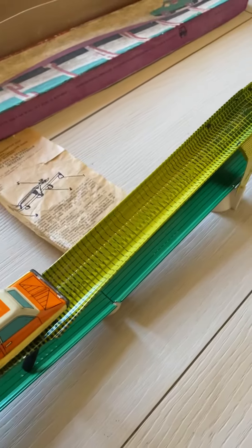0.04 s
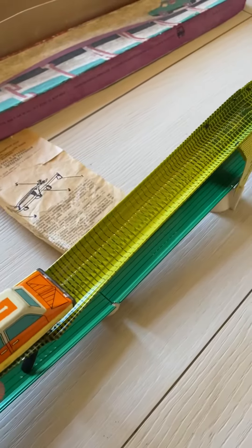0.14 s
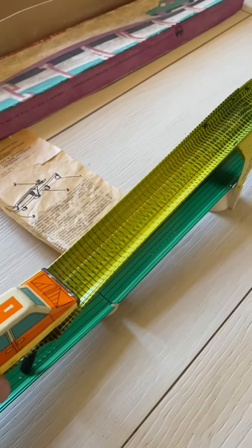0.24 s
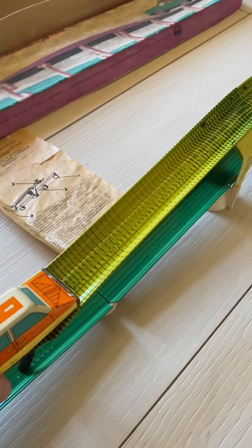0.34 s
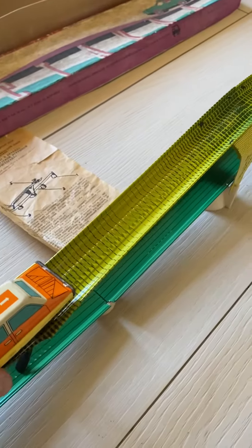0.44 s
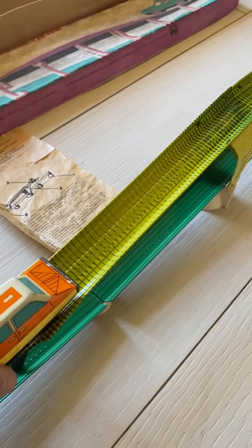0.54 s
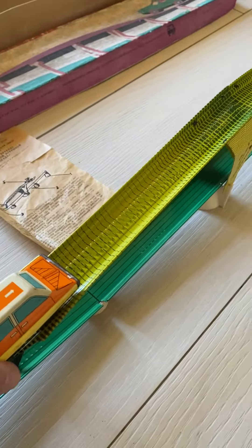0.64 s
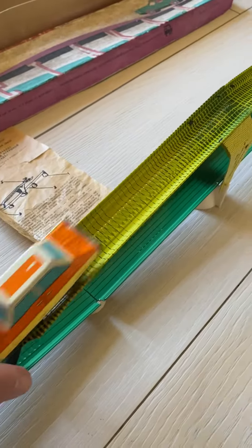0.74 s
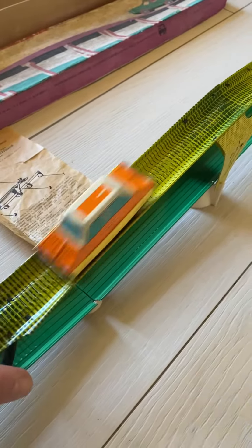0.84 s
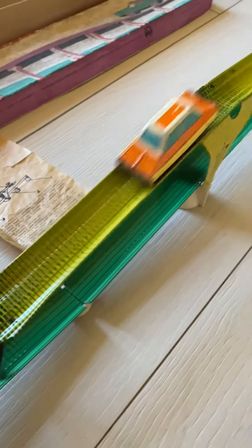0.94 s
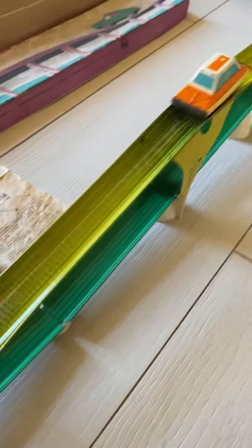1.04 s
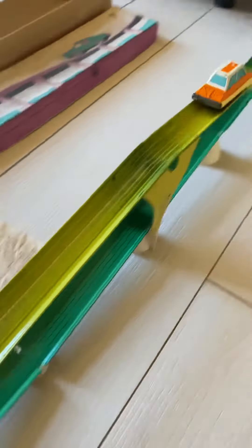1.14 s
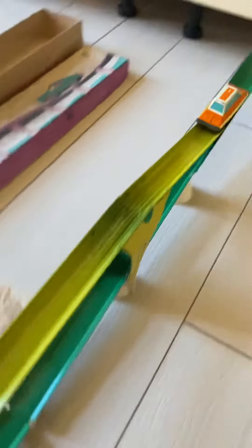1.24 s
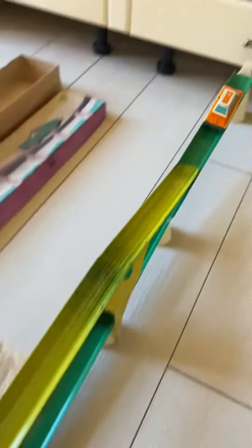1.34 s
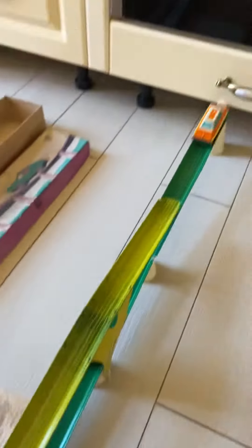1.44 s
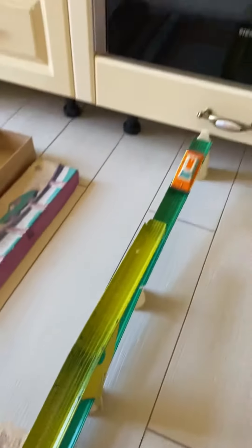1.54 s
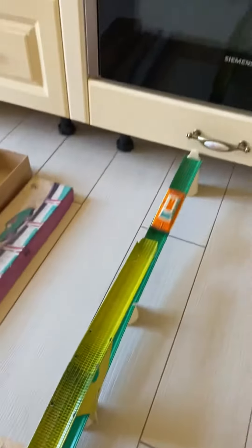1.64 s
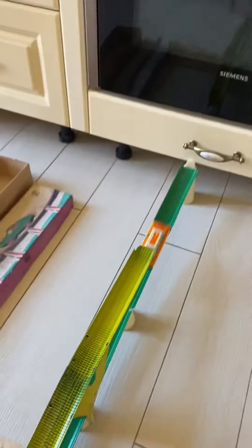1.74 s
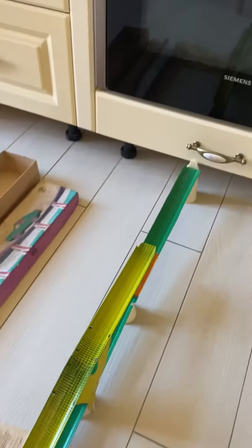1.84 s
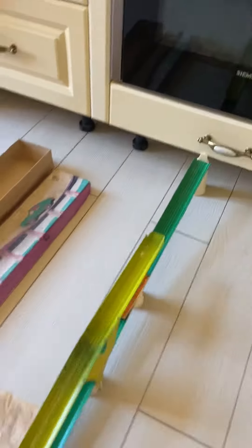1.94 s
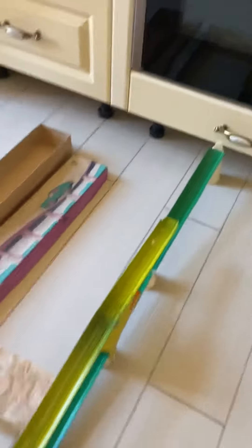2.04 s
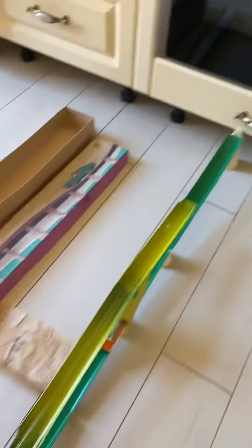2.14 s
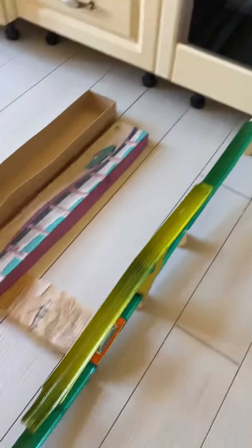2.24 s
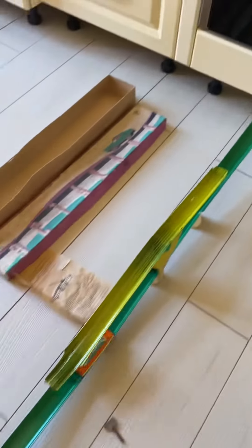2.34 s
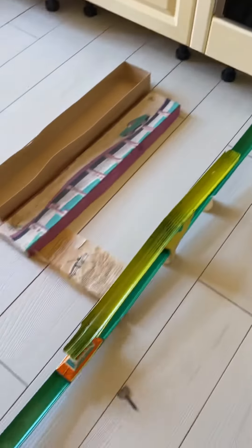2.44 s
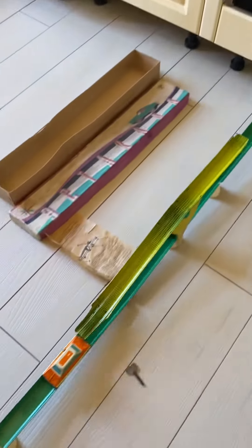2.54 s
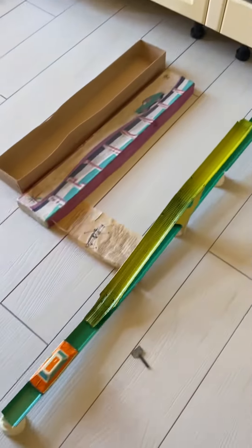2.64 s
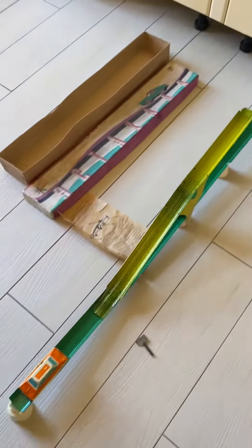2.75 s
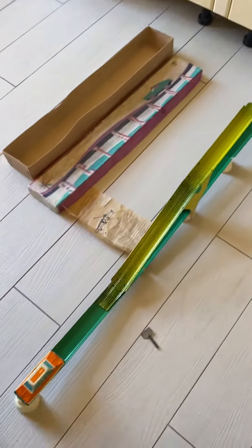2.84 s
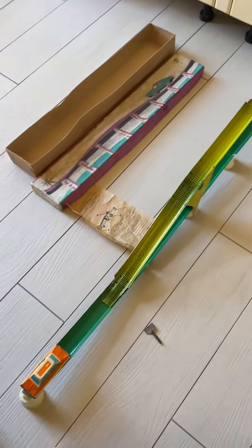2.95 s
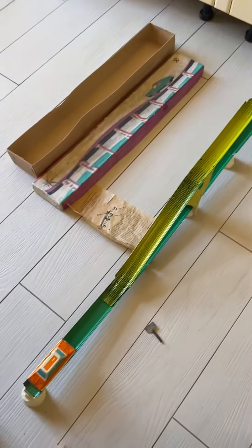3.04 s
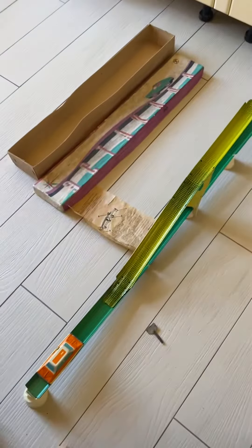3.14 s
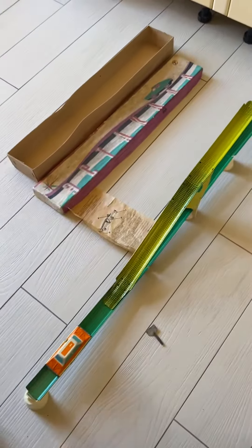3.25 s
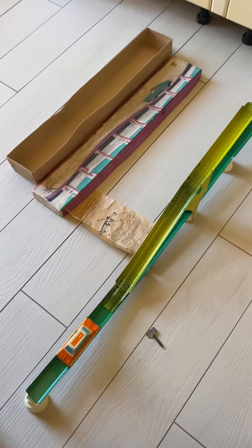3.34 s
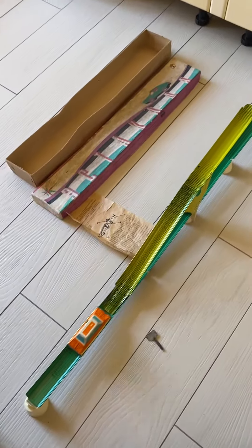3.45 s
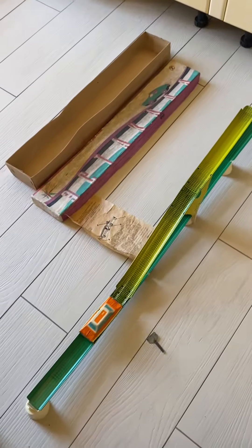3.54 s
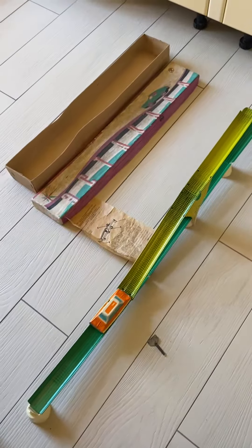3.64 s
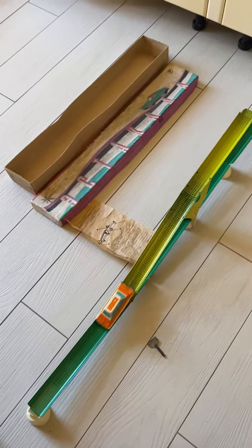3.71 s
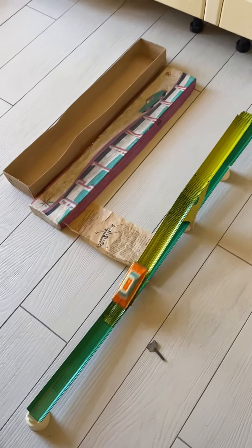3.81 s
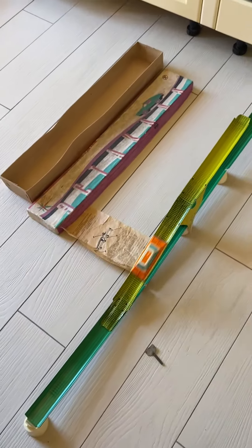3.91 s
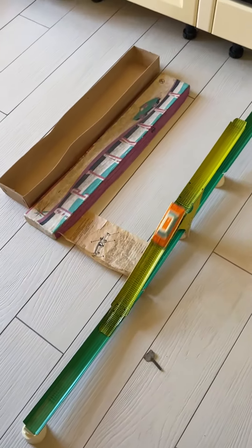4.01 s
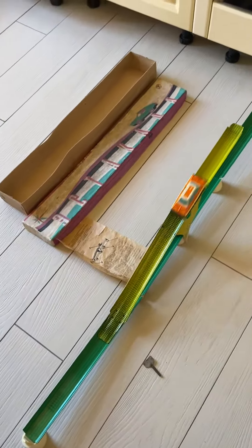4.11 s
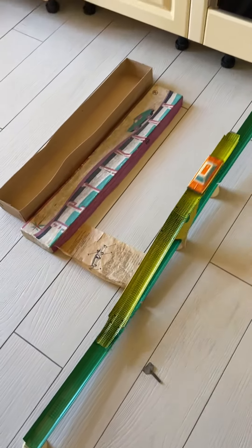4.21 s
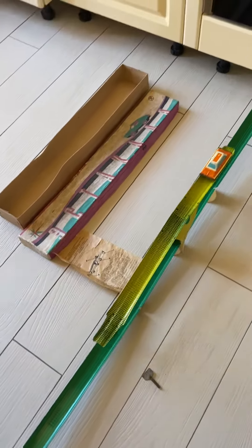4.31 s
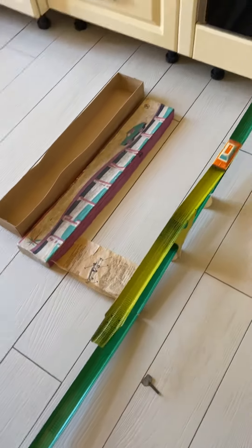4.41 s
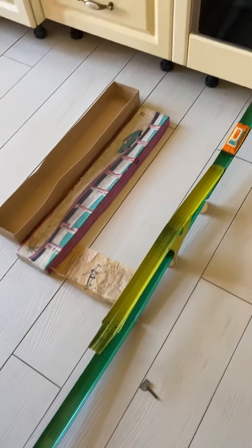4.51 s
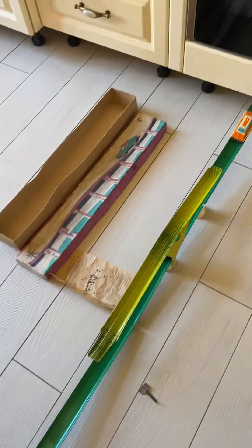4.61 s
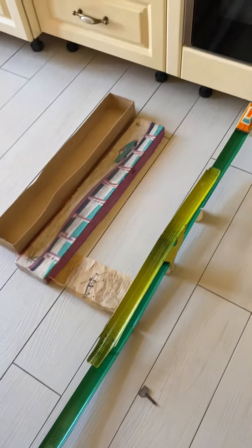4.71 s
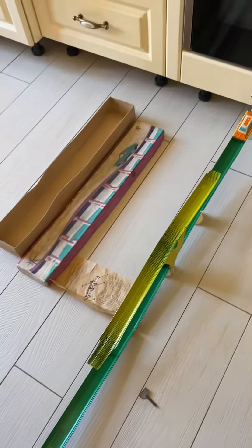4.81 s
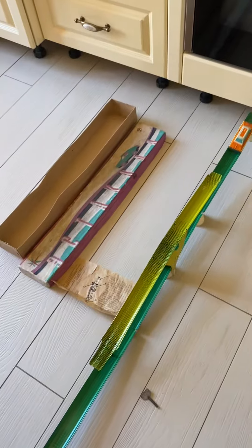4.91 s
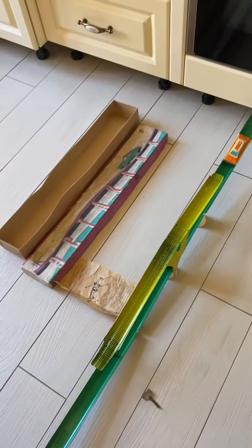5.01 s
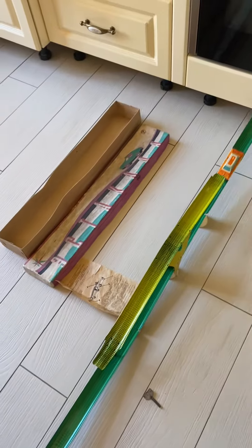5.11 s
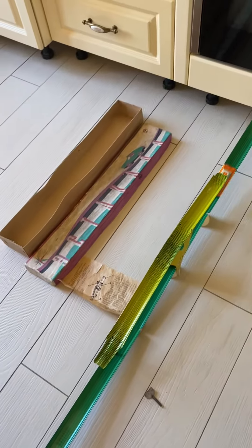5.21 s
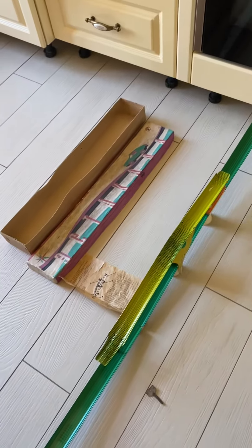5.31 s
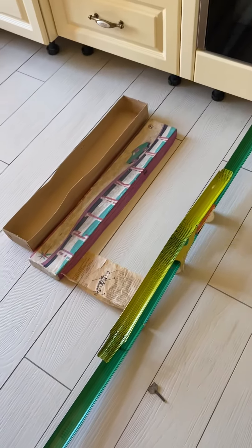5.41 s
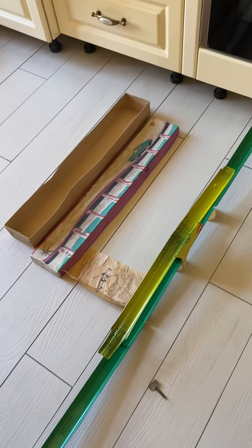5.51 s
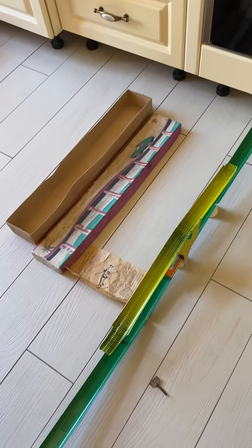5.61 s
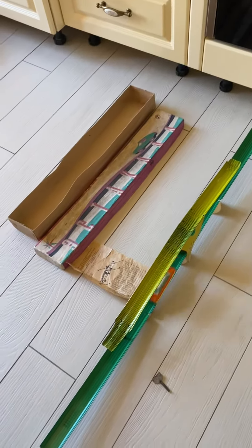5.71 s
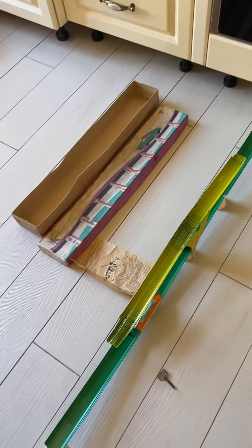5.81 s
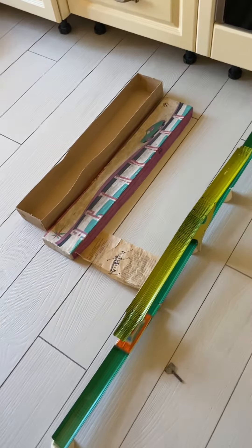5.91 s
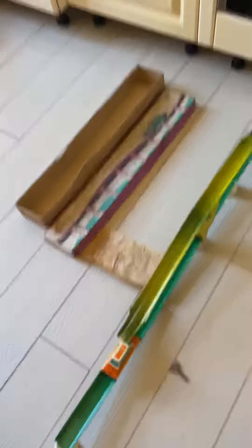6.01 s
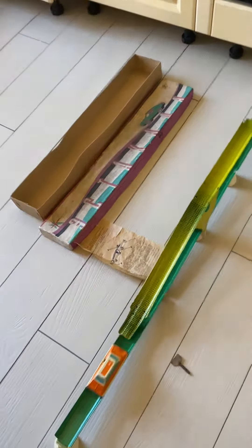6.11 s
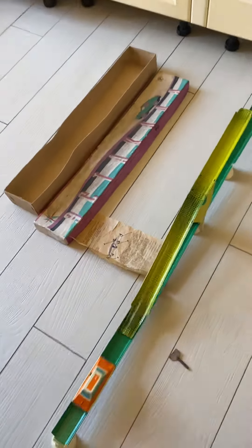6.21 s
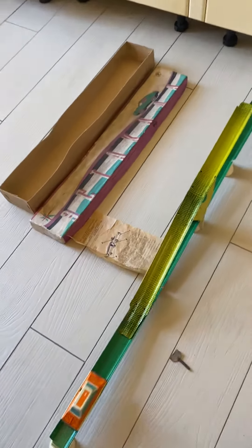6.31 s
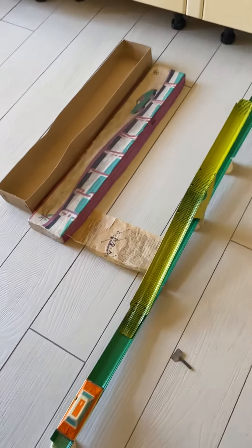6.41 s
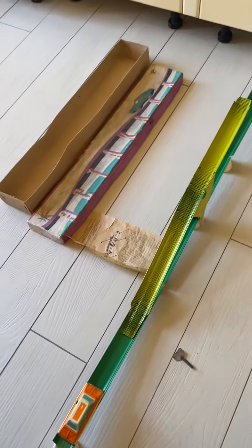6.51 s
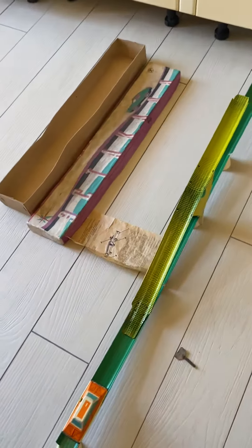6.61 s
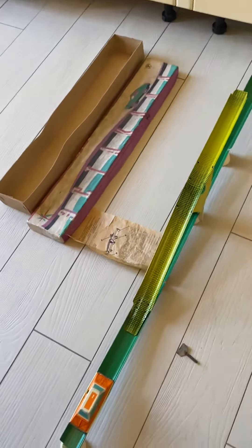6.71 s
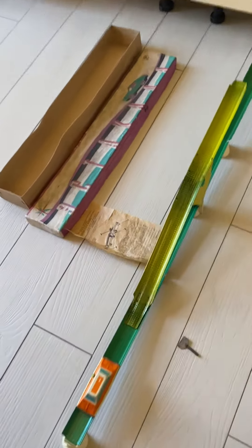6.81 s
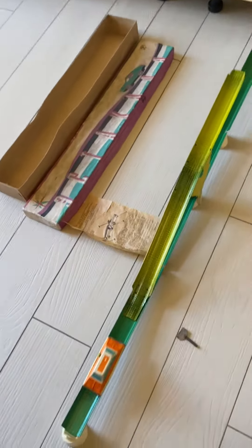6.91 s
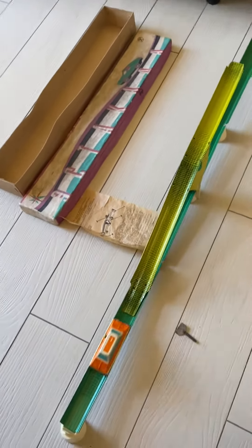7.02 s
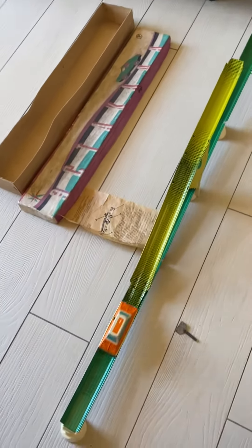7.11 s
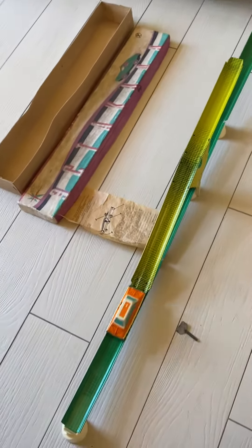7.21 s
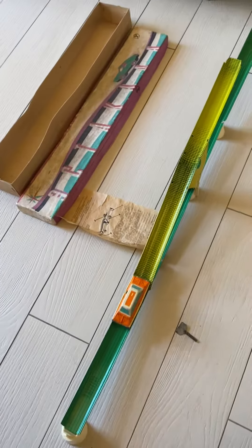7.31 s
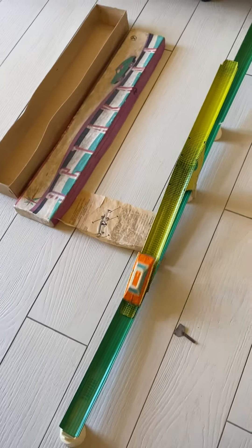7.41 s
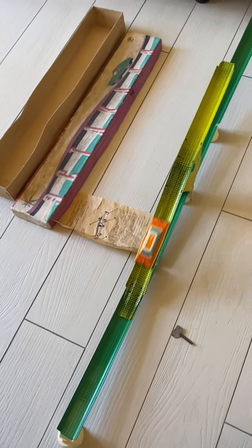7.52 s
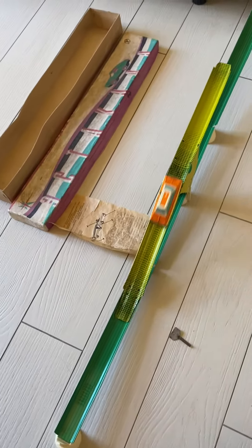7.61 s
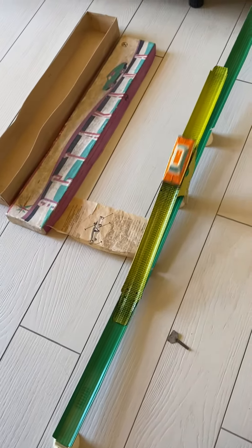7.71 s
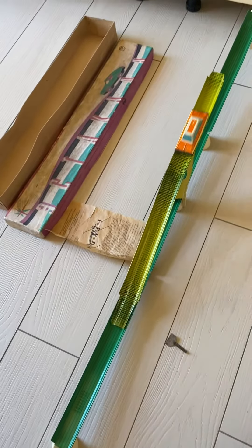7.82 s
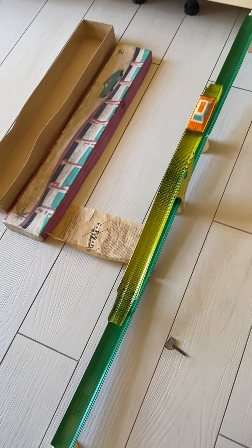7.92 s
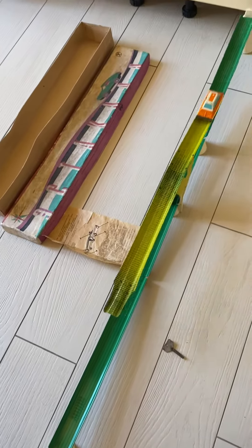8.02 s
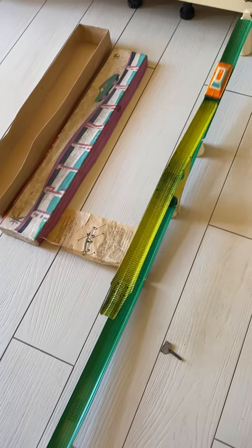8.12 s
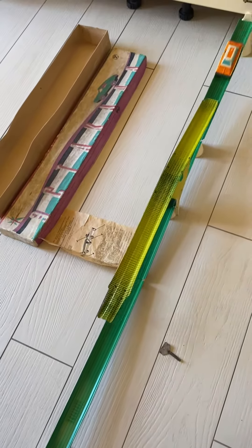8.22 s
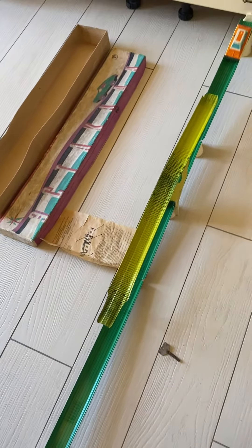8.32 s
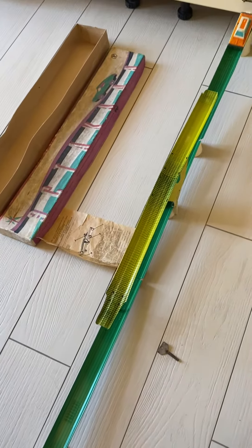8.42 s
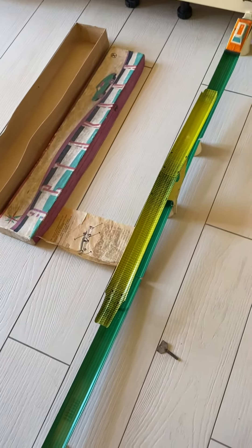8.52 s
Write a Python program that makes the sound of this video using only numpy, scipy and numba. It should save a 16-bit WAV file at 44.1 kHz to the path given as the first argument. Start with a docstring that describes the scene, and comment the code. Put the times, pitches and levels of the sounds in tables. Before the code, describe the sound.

In a quiet kitchen, a low hum wavers and a hand shifts a clockwork tin car with a few small clicks. The car sets off, rasping up a ribbed metal ramp, then clanks down and bumps a hollow end stop. Its wheels and gears chatter along the track, clanking over joints. The climb and bump happen three times in all, heard close by in stereo with a short room tail.

```python
"""A low hum wavers in a quiet kitchen; a hand shifts a tin clockwork car, which sets off on a tin track.
Three times its cog rasps up a ribbed ramp, each rib shaking the two ringing leaves.
Between climbs its wheels and gears chatter, it clanks over joints and thuds into the hollow end stop.
Hard floor and cupboards add a short tail."""
import sys
import numpy as np
from scipy import signal
from scipy.fft import rfft, irfft, next_fast_len
from scipy.io import wavfile
from scipy.ndimage import uniform_filter1d
from numba import njit

SR = 44100
rng = np.random.default_rng(int(sys.argv[2]) if len(sys.argv) > 2 else 0)


def store_pcm(level_fs):
    """Save levels as 16-bit WAV."""
    pcm = np.round(np.clip(level_fs, -1, 1) * 32767).astype(np.int16)
    wavfile.write(sys.argv[1], SR, np.atleast_2d(pcm).T)


N = 377055
T = np.arange(N) / SR

# hum and rumble envelope: time_s, level_db
HUM_LEVELS = [(0.0, -34.5), (0.09, -52), (0.14, -43), (0.76, -45.5), (0.83, -62), (1.07, -63), (1.19, -52),
              (1.4, -72), (1.59, -58), (1.71, -93), (1.9, -64), (2.07, -88.5), (4.5, -63.5), (4.55, -75),
              (6.45, -59.5), (6.69, -65.5), (7.98, -60), (8.1, -63.5), (8.45, -58), (8.55, -59)]
# faint tones above the hum: pitch_hz, width_hz, relative_db
RUMBLE_TONES = [(84, 12, 3), (105, 20, -2.5), (157, 12, -9), (216, 14, -1), (352, 10, -16.5),
                (563, 14, -14)]
# room air spectrum: freq_hz, relative_db
AIR_COLOUR = [(30, 0), (60, 0.5), (100, -9), (200, -8.5), (300, -10), (600, -16), (1000, -18), (2050, -22),
              (2250, -15), (2450, -27), (3000, -57), (5000, -68.5), (9000, -51)]
# hand shifting the car at the ramp foot: time_s, level_db
HAND_SHIFT = [(0.2, -95.5), (.42, -59.5), (.53, -50.5), (.66, -81.5)]
# lap timing: start_s, meet_ramp_s, crest_s, leave_ramp_s, land_s, bump_stop_s, halt_s,
# upper_drone_offset_db, rib_hz, rolling_offset_db
LAPS = [(0.675, 0.684, 1.015, 1.235, 1.27, 1.42, 2.95, -7, 326.5, 0),
        (3.0, 3.613, 4.09, 4.385, 4.44, 4.731, 6.44, 1, 354, -1),
        (6.66, 7.24, 7.725, 7.855, 7.94, 8.415, 10.1, -7, 340, 0)]
# one lap on plain track: stage, rolling_db, treble_db, upper_drone_db, lower_drone_db, clank_body_db
# stage 0 sets off, 1 meets the ramp, 2 lands, 3 bumps the stop, 4 halts
LAP_PROFILE = [(0, -79.5, -5, -3, -16.5, -5.5), (.4, -59, -11.5, -13.5, -20.5, -20),
               (1.002, -48, -11, -14, -17.5, -42), (2, -40.5, -11.5, -15, -23, -28),
               (2.7, -43.5, -9.5, -7.5, -14.5, -75), (3, -43.5, -20, -9, -17, 12.5),
               (3.09, -57.5, -13, -4, -6, -25), (3.15, -50, -10, -7, -12.5, 12),
               (3.4, -42.5, -10.5, -10.5, -20, -6.5), (3.72, -42, -4, -17.5, -46, -49),
               (3.88, -47, -2.5, -20, -19, -67), (3.969, -53, -4.5, -44, -29, -35),
               (4, -77, 5, -16, -23.5, -20)]
# track hollows, upper then lower: pitch_hz, width_hz
TRACK_HOLLOWS = [(797, 55), (640, 40)]
# broad track response: freq_hz, gain_db
TRACK_COLOUR = [(100, -16), (400, -16.5), (800, -6), (2000, -2), (3200, -2), (5000, -3.5), (8000, -2),
                (12000, -12.5), (16000, -25.5)]
# track resonances: pitch_hz, width_hz, gain_db
TRACK_MODES = [(980, 71, -10), (1380, 41, -4), (1484, 50, -11), (2913, 33, -6), (2073, 770, 5),
               (2450, 60, -13.5), (2720, 89, -5), (3130, 23, -12), (3590, 37, -19), (3860, 36, -9.5),
               (4320, 59, -7.5), (5150, 55, -15.5), (8500, 260, -7.5)]
# wheels on joints and ramp ends: start_s, level_db, treble_db, rattle_t60_s,
# then pitch_hz, level_db for each of three struck rings (main, second, low hollow)
CLANKS = [(0.3093, -45, -10, 0.24, 1540, -63, 2180, -66, 920, -70),
          (0.3128, -35, -8, 0.11, 1540, -51, 2690, -61, 920, -64),
          (0.382, -31, -7, 0.032, 2030, -37, 2880, -46, 830, -71),
          (0.6857, -20, -26, 0.021, 3420, -21.5, 2030, -21, 1290, -51),
          (0.6868, -22, -13, 0.033, 4190, -21, 5150, -25, 1290, -53),
          (0.7284, -16, 1, 0.25, 2180, -27, 1790, -44, 1290, -41),
          (0.7524, -16.5, 8, 0.092, 2310, -24.5, 1290, -29, 1090, -39),
          (1.2053, -18.5, -26, 0.32, 2310, -31, 2690, -41, 920, -39),
          (1.42, -21, -16, 0.23, 2180, -19, 1540, -24, 830, -38),
          (1.546, -24.5, -10, 0.37, 2180, -37, 2880, -40, 1290, -52),
          (1.691, -40, -19, 0.094, 1790, -56, 2310, -59, 830, -47),
          (1.811, -38, -13, 0.12, 2180, -61, 1790, -48, 1090, -55),
          (1.8832, -30.5, -18, 0.24, 3590, -42, 1540, -42, 1290, -45),
          (1.9764, -30, -12, 0.16, 2030, -40, 3420, -46, 830, -50),
          (2.05, -38, -14, 0.24, 1410, -40.5, 2030, -33, 830, -46),
          (2.1253, -40, -17, 0.08, 1790, -36, 3190, -56, 1410, -44),
          (2.2019, -34, -13.5, 0.1, 2030, -36, 1410, -44, 830, -56),
          (2.297, -27.5, -14.5, 0.82, 2450, -40, 1410, -45, 1290, -41),
          (2.343, -23.5, 3, 0.089, 2180, -34, 4310, -32, 1290, -50),
          (2.406, -23, -7, 0.14, 3190, -42, 2180, -40, 920, -63),
          (2.439, -30, 4, 0.053, 2180, -40, 3190, -46, 1290, -52),
          (2.534, -24.5, 1, 0.057, 2030, -32, 2690, -39, 920, -68),
          (2.5982, -27.5, 6.5, 0.2, 2030, -34, 2450, -38, 920, -64),
          (2.626, -25.5, -31.5, 0.18, 2880, -37, 2310, -53, 1290, -52),
          (2.781, -31.5, 1, 0.059, 2180, -42, 3590, -55, 920, -65),
          (2.8321, -29.5, -12, 0.41, 1790, -23.5, 2180, -47, 830, -41.5),
          (3.178, -53.5, -11.5, 0.53, 2180, -59, 1790, -60, 920, -64),
          (3.208, -58, -14, 0.25, 2180, -55, 2880, -58, 920, -61),
          (3.299, -54, -13.5, 0.062, 3190, -64, 2030, -58, 920, -68),
          (3.413, -50, -9, 0.21, 2310, -51.5, 1410, -63, 1090, -64),
          (3.478, -42, -17, 0.22, 2180, -50, 920, -56, 830, -63),
          (3.518, -28.5, -23, 0.34, 2310, -48, 4310, -41.5, 1290, -54),
          (3.611, -41, 11, 0.085, 1290, -35, 4310, -54, 1090, -55),
          (4.351, -21, -17, 0.37, 3190, -31, 2690, -30, 830, -33.5),
          (4.368, -23, -21, 0.13, 2690, -25, 830, -32, 920, -39),
          (4.442, -25, -20, 0.11, 3190, -41, 2880, -49, 1290, -49),
          (4.6105, -36, -19, 0.036, 830, -67, 2880, -59, 1090, -53),
          (4.677, -20.5, -6.5, 0.16, 2030, -27, 2450, -31, 1290, -52),
          (4.7274, -30, -25, 0.18, 2880, -44, 2030, -37, 1090, -43),
          (4.8973, -44.5, -13, 0.28, 830, -55, 1290, -54, 1090, -56),
          (4.967, -40.5, -10, 0.1, 2030, -50, 2880, -61, 830, -65),
          (5.053, -40.5, -14, 0.27, 2690, -40, 2180, -38, 830, -57),
          (5.2, -39, -10, 0.12, 830, -59, 2690, -45.5, 1090, -68),
          (5.316, -29.5, -18, 0.2, 2310, -56, 830, -48, 1090, -52),
          (5.362, -24, -29, 0.08, 3190, -52, 2450, -39, 1290, -48),
          (5.402, -33, -23, 0.17, 1410, -45, 2450, -45, 1290, -38),
          (5.4492, -43, -18, 0.055, 2880, -46, 2450, -44, 1290, -58),
          (5.482, -31, -30, 0.05, 2030, -36, 2690, -49, 830, -60),
          (5.5338, -46, -16.5, 0.05, 2310, -55, 1790, -54, 830, -65),
          (5.562, -36, -17, 0.078, 3190, -48, 1410, -63, 830, -70),
          (5.6472, -36, -16, 0.054, 3190, -49, 1410, -45.5, 830, -58),
          (5.706, -56, -10, 0.055, 2450, -49, 2880, -56, 830, -49),
          (5.782, -30, -20, 0.23, 2450, -46, 1290, -49, 1090, -47),
          (5.829, -22.5, -13, 0.22, 1540, -41, 2180, -49, 1290, -47),
          (5.97, -24.5, 1.5, 0.11, 2450, -45, 1540, -46, 920, -63),
          (6.0408, -28, -4.5, 0.21, 2450, -38, 1290, -37, 830, -62),
          (6.103, -25, 3.5, 0.17, 4310, -34, 3190, -34.5, 920, -55),
          (6.132, -25.5, -16, 0.28, 4310, -35, 2180, -49, 1290, -49),
          (6.243, -35, 0, 0.077, 2880, -51, 3190, -57, 1090, -61),
          (6.301, -27, -1.5, 0.11, 2310, -50, 3190, -51, 1090, -69),
          (6.755, -49.5, -18, 0.059, 4310, -66.5, 1790, -71, 830, -71),
          (6.838, -59, -5.5, 0.062, 2310, -63, 1410, -70, 1090, -67),
          (6.923, -52, -10, 0.093, 2310, -57, 1540, -63, 1290, -61),
          (7.001, -47, -14, 0.071, 1540, -50, 2030, -43.5, 1290, -58.5),
          (7.011, -37.5, -15, 0.12, 2450, -45.5, 3590, -64, 830, -57),
          (7.1388, -27.5, -8, 0.65, 2310, -43, 2690, -53, 1090, -56),
          (7.241, -27.5, -24, 1, 1410, -31, 2880, -42, 1290, -48),
          (7.947, -36, -23, 0.11, 2690, -52, 2310, -54, 830, -52),
          (7.9819, -19.5, -7, 0.4, 2310, -33, 2690, -27, 830, -30.5),
          (8.0053, -27, -1, 0.088, 2450, -24, 2030, -31, 830, -41),
          (8.0077, -18.5, -5, 0.057, 3190, -37, 1790, -20, 830, -50),
          (8.052, -26.5, -14, 0.73, 2030, -33, 2690, -42, 920, -52),
          (8.242, -44, -31, 0.11, 2310, -39, 1790, -57, 830, -46),
          (8.3608, -21.5, -4, 0.13, 2180, -32, 2690, -41, 1290, -46),
          (8.381, -23.5, -26, 0.13, 2690, -28.5, 2030, -36, 1290, -52),
          (8.411, -35, -19, 0.25, 2450, -42, 1290, -39, 830, -47)]
# joint resonances: pitch_hz, shaken_db, t60_s
JOINT_RINGS = [(830, -43, 0.084), (920, -40.5, 0.106), (1090, -48, 0.11), (1290, -38, 0.034),
               (1410, -39.5, 0.078), (1540, -31.5, 0.0376), (1790, -28.5, 0.016), (2030, -22, 0.035),
               (2180, -14, 0.043), (2310, -10.5, 0.084), (2450, -12.5, 0.061), (2690, -8.5, 0.0446),
               (2880, -15.5, 0.077), (3190, -19.5, 0.17), (3420, -27.5, 0.044), (3610, -24, 0.25),
               (4190, -30, 0.029), (4310, -16.5, 0.054), (5150, -31.5, 0.04)]
# rasp envelope, one list per climb: time_s, level_db, treble_db, body_db
CLIMBS = [
    [(.684, -28.5, 1.5, 8), (.74, -27.5, 0, 8), (.79, -31, 0.5, 0.5), (.87, -24, -2.5, 0.5),
     (1.01, -29.5, 0, 5), (1.035, -30.5, -5, 4), (1.1, -34, 0.5, 10), (1.235, -32.5, -3.5, 0)],
    [(3.616, -35, 0.5, 9.5), (3.695, -29, -4, 7), (3.72, -32, -7, 7.5), (3.83, -31, -0.5, 6.5),
     (3.94, -27, -1, 2.5), (4.064, -24.5, -3.5, 0.5), (4.1, -30.5, -0.5, 8), (4.2, -29.5, -2, 7.5),
     (4.385, -26, -6, 3)],
    [(7.243, -32, 0, 3), (7.28, -29.5, 0, 9.5), (7.37, -28, -5, 7), (7.45, -29.5, 2.5, 9),
     (7.52, -25, -1.5, 1), (7.6, -25.5, -2.5, 1.5), (7.69, -27.5, -2.5, 3.5), (7.735, -29.5, -2.5, 8.5),
     (7.79, -32.5, 1.5, 11), (7.855, -32, -1.5, 8.5)],
]
# broad ramp response: freq_hz, gain_db
RAMP_COLOUR = [(100, -21), (500, -22.5), (1000, -13), (1900, -7.5), (3500, -3.5), (6500, 3.5), (9000, 4.5),
               (13000, 2.5), (16000, 1.5)]
# ramp resonances: pitch_hz, width_hz, rising_leaf_db, falling_leaf_db
RAMP_MODES = [(640, 40, -10, -12), (1400, 110, -3, -5), (1930, 90, -7, -5), (2030, 60, -5, -9),
              (2130, 60, -9, -3), (2270, 130, -3, -10), (2450, 60, -5, -10), (2815, 30, 4, -2),
              (3235, 40, -1, -9), (3520, 40, -7, -14), (3760, 50, -8, -12), (5070, 120, -10, -4),
              (5750, 90, -12, -13), (6100, 90, -12, -13), (4200, 70, -7, -9), (4850, 80, -6, -13),
              (5330, 90, -1, -7), (5410, 70, -6, -9), (6550, 90, -6, -14), (7400, 100, -6, -12),
              (7850, 150, -5, -12), (8480, 100, -11, -12), (8800, 200, -9, -1), (9400, 110, -10, -12),
              (9930, 60, -5, -12), (10580, 130, -8, -7), (11010, 90, -7, -10), (12430, 80, -4, -12),
              (12900, 200, -9, 0), (13950, 130, -10, -2), (14650, 130, -6, -8), (15450, 150, -4, -3)]
# car jolting off or bumping the stop: start_s, push_db
THUDS = [(0.684, -47), (0.749, -50.5), (1.422, -40.5), (4.736, -44), (8.427, -42.5)]
# hollow stop and floor: pitch_hz, gain_db, t60_s
THUD_MODES = [(102, -5, .4), (145, -7, .22), (180, -8, .15), (205, -1, .25), (255, -5, .2), (325, -3, .16),
              (418, -8, .14), (484, -6, .13), (528, 0, .2), (603, -8, .15)]
# phase between microphone ports: freq_hz, left_lead_rad
PORT_LEAD = [(0, 0), (1550, -0.0), (3790, 0.7), (5170, 0.1), (5600, 0.7), (6370, 2.6), (8180, 3.5),
             (9730, 6.2), (11600, 6.5), (11900, 7.8), (12600, 9.1), (14400, 9.7), (15700, 12.2),
             (16400, 12.4)]
# balance between microphone ports: freq_hz, left_minus_right_db
PORT_BALANCE = [(60, -0.5), (110, -0.5), (200, -1.0), (380, -2.0), (700, -2.5), (1290, -1.0), (2380, -0.5),
                (4400, -0.5), (8120, 0.0), (15000, 0.0)]

HOP_SAMPLES = 32  # update interval of drifting modes


def undb(db):
    return 10 ** (np.asarray(db) / 20)


def unit(x):
    return x / np.sqrt(np.mean(x ** 2))


def decay(t, t60_s):
    return np.exp(-np.log(1000) * t / t60_s)


def curve(x, points):
    return np.interp(x, *np.transpose(points))


def butter(x, hz, kind="low", order=2):
    return signal.sosfilt(signal.butter(order, hz, kind, fs=SR, output="sos"), x)


def band(x, hz, width_hz):
    """Two-pole resonance, unity gain at the centre."""
    return signal.lfilter(*signal.iirpeak(hz, hz / width_hz, SR), x)


def steep_band(x, hz, width_hz):
    return band(band(x, hz, width_hz), hz, width_hz)


def tilt(x, treble_db, split_hz):
    low = butter(x, split_hz)
    return low + undb(treble_db) * (x - low)


def colour(x, points):
    """Minimum-phase filter through (freq_hz, gain_db) points, by folded cepstrum."""
    hz, db = np.transpose(points)
    grid_hz = np.linspace(1, SR / 2, 1025)
    cepstrum = irfft(np.log(undb(np.interp(np.log(grid_hz), np.log(hz), db))))
    cepstrum[1:1024] *= 2
    cepstrum[1025:] = 0
    return signal.oaconvolve(x, irfft(np.exp(rfft(cepstrum))))[:N]


def walk(rate_hz, count=N):
    """Slewed random steps, spread near 1."""
    hold = int(SR / rate_hz)
    steps = rng.standard_normal(4096)[:count // hold + 1]
    return 1.2 * uniform_filter1d(np.repeat(steps, hold)[:count], hold)


def grit(rate_hz, spread_db, hiss):
    """Tiny random contacts of uneven force over a scraping hiss."""
    hits = rng.random(N) < rate_hz / SR
    force = np.minimum(rng.exponential(size=N), 3)
    contacts = hits * np.sign(rng.standard_normal(N)) * undb(spread_db * force)
    return unit(unit(contacts) + hiss * rng.standard_normal(N))


@njit
def resonators(x, tuning, damping, gain, hop):
    """State-variable bandpass bank; tuning and gain step once a hop."""
    out = np.zeros(len(x))
    mid, low = np.zeros(len(damping)), np.zeros(len(damping))
    for i in range(len(x)):
        for m in range(len(damping)):
            g = tuning[i // hop, m]
            drive = gain[i // hop, m] * x[i] + 1e-18
            v = (mid[m] + g * (drive - low[m])) / (1 + g * (g + damping[m]))
            mid[m] = 2 * v - mid[m]
            low[m] += 2 * g * v
            out[i] += damping[m] * v
    return out


def tin(push, points, modes, ring_db, wander_db, wander_hz, drift_widths):
    """Sheet metal: broad colour plus narrow modes that wander in level and pitch."""
    def slow(rate_hz):
        return walk(rate_hz * HOP_SAMPLES, count=len(push[::HOP_SAMPLES]))

    broad = colour(push, points)[:len(push)]
    gain = np.array([undb(db + wander_db * slow(wander_hz)) * np.sqrt(hz / width)
                     for hz, width, db in modes])
    drifts = np.broadcast_to(drift_widths, len(modes))
    centre_hz = np.array([hz + drift * width * slow(wander_hz / 2)
                          for (hz, width, _), drift in zip(modes, drifts)])
    tuning = np.tan(np.pi * centre_hz / SR)
    damping = np.array([width / hz for hz, width, _ in modes])
    rings = resonators(broad, tuning.T.copy(), damping, gain.T.copy(), HOP_SAMPLES)
    return broad + undb(ring_db) * rings


def hum(pitch_hz=56, wander_hz=2.5, loosen_s=.8):
    """A wavering low tone loosens into narrow noise, with faint rumble above."""
    phase = np.cumsum(pitch_hz + wander_hz * walk(10)) / SR
    tone = np.sqrt(2) * np.sin(2 * np.pi * phase) * undb(2.8 * walk(8.7))
    noise = unit(steep_band(rng.standard_normal(N), pitch_hz, 31.4))
    loose = np.clip((T - loosen_s) * 10, 0, 1)
    rumble = sum(undb(db) * unit(band(rng.standard_normal(N), hz, width))
                 for hz, width, db in RUMBLE_TONES)
    return ((1 - loose) * tone + loose * noise + undb(-19) * rumble) * undb(curve(T, HUM_LEVELS))


def air():
    """Faint room noise, centred in the bass, wide above."""
    mid, side = (unit(colour(rng.standard_normal(N), AIR_COLOUR)) for _ in range(2))
    side = butter(side, 250, "high") * np.array([[1], [-1]])
    return undb(-65.5 + 2.5 * walk(7)) * (mid + .75 * side)


def track_controls():
    """Hand shift and laps per sample: gain, treble_db, upper_drone_db, lower_drone_db, clank_body_db."""
    laps = np.array(LAPS)
    marks_s = laps[:, [0, 1, 4, 5, 6]]
    lap = np.clip(np.searchsorted(marks_s[:, 0], T) - 1, 0, None)
    drone_offset_db, _, rolling_offset_db = laps[lap, -3:].T
    stage = np.interp(T, marks_s.ravel(), np.arange(marks_s.size)) % 5
    on_track = (T > marks_s[0, 0]) & (stage < 4) & ((stage < 1) | (stage > 2))
    stages, *columns = np.transpose(LAP_PROFILE)
    level_db, treble_db, upper_db, lower_db, body_db = (np.interp(stage, stages, c) for c in columns)
    gain = undb(level_db + rolling_offset_db) * on_track
    gain += undb(curve(T, HAND_SHIFT)) * (T > HAND_SHIFT[0][0]) * (T < HAND_SHIFT[-1][0])
    return uniform_filter1d(gain, size=300), treble_db, upper_db + drone_offset_db, lower_db, body_db


def rolling(tick_rate_hz=22, tick_decay_s=.006):
    """Wheels and gears chatter and tick on plain track; its hollows drone underneath."""
    gain, treble_db, *drone_db, _ = track_controls()
    taps = (rng.random(N) < tick_rate_hz / SR) * np.minimum(rng.exponential(size=N), 2)
    ticks = signal.lfilter([1], [1, -np.exp(-1 / (tick_decay_s * SR))], taps)
    push = gain * (1 + .35 * ticks) * undb(1.5 * walk(70)) * grit(4500, spread_db=1.8, hiss=.9)
    drone = sum(unit(band(rng.standard_normal(N), hz, width)) * undb(db + 2.6 * walk(23))
                for (hz, width), db in zip(TRACK_HOLLOWS, drone_db))
    sheet = tin(push, TRACK_COLOUR, TRACK_MODES,
                ring_db=-7, wander_db=3.5, wander_hz=20, drift_widths=.3)
    return tilt(undb(4.5) * sheet, treble_db, split_hz=4000) + gain * drone


def clanks(feed_t60_s=.17, scatter_db=4, strike_boost_db=4.5):
    """A wheel cracks on a joint, the loose car rattles to rest; joint and hollow track ring."""
    t = T[:SR // 3]
    shake = np.zeros((3, N + SR))  # middle, treble, body
    shaken, struck = np.zeros((2, N + SR))
    rattle = np.pad(grit(4000, spread_db=2.5, hiss=.8) * undb(1.8 * walk(150)), (0, SR))
    snap = rng.standard_normal(N + SR)
    rough = 1 + .55 * walk(350, count=N + SR)  # the car keeps touching the ringing tin
    body_db = track_controls()[-1]
    scatters = rng.standard_normal((len(CLANKS), len(JOINT_RINGS)))
    ring_hz, ring_db, ring_t60_s = np.transpose(JOINT_RINGS)
    responses = np.array([band(signal.unit_impulse(2048), hz, 61) for hz in ring_hz])
    crack = 1.4 * np.exp(-t / .003) * np.clip(t / .0006, 0, 1)
    for (start_s, level_db, treble_db, t60_s, *rings), scatter in zip(CLANKS, scatters):
        span = slice(int(start_s * SR), int(start_s * SR) + len(t))
        settle = decay(t, t60_s) * np.clip(t / .006, 0, 1)
        burst = undb(level_db) * (crack * snap[span] + settle * rattle[span])
        shake[:, span] += undb([[0], [treble_db], [body_db[span.start]]]) * burst
        joint = undb(ring_db + scatter_db * scatter) @ responses
        shaken[span] += signal.fftconvolve(burst * decay(t, feed_t60_s), joint)[:len(t)]
        for hz, db in np.reshape(rings, (3, 2)):  # three rings take the blow squarely
            k = np.argmin(abs(ring_hz - hz))
            phase = ring_hz[k] * (1 + .008 * scatter[k]) * t + scatter[k - 1]
            envelope = np.clip(t * hz / 4.3, 0, 1) * rough[span] * decay(t, ring_t60_s[k])
            struck[span] += undb(db + strike_boost_db) * envelope * np.sin(2 * np.pi * phase)
    middle = tin(shake[0, :N], TRACK_COLOUR, TRACK_MODES,
                 ring_db=-17, wander_db=4, wander_hz=12, drift_widths=.3)
    treble = butter(shake[1, :N], 5500, "high")
    body = steep_band(shake[2, :N], 590, 1000)
    return undb(-.5) * (middle + treble) + undb(-10) * body + undb(-3) * shaken[:N] + struck[:N]


def ramp_controls(bite_s=.0098, fade_db_per_s=205, treble_fade_db_per_s=273):
    """The cog bites, tips onto the falling leaf at the crest and runs off the last rib."""
    gain, treble_db, body_db, tipped = np.zeros((4, N))
    for (_, meet_s, crest_s, leave_s, land_s, *_), climb in zip(LAPS, CLIMBS):
        active = (T > meet_s - bite_s) & (T < land_s + .08)
        past_s = np.maximum(T - leave_s, 0)
        times_s, *columns = np.transpose(climb)
        level_db, high_db, low_db = (np.interp(T, times_s, c) for c in columns)
        bite = np.clip((T - meet_s) / bite_s + 1, 0, 1) ** 2
        gain += active * bite * undb(level_db - fade_db_per_s * past_s)
        treble_db += active * (high_db - treble_fade_db_per_s * past_s)
        body_db += active * low_db
        tipped += active * np.clip((T - crest_s) / .0033, 0, 1)
    return gain, treble_db, body_db, tipped


def ramp_rasp(ribs_per_turn=14, minor_count=22):
    """A slightly out-of-round cog skips over ribs; each shakes a burst of contacts into the tin."""
    gain, treble_db, body_db, tipped = ramp_controls()
    rib_hz = curve(T, np.array(LAPS)[:, [1, -2]]) * (1 + .06 * walk(60))
    phase = np.cumsum(rib_hz) / SR
    ribs = 1 + 2.2 * np.exp(-(phase % 1) / .25)
    wobble = undb(np.sin(2 * np.pi * phase / ribs_per_turn) + .66 * walk(100))
    push = gain * unit(ribs * wobble * grit(5500, spread_db=1.1, hiss=.35))
    on_ramp = gain > 0
    falling = tipped[on_ramp][::HOP_SAMPLES]
    modes = [(hz, width, up_db + (down_db - up_db) * falling - .83 * np.log2(hz / 3000))
             for hz, width, up_db, down_db in RAMP_MODES]
    minor_hz = np.geomspace(1700, 4700, minor_count) * (1 + .008 * rng.standard_normal(minor_count))
    modes += [(hz, 50, -11.5) for hz in minor_hz]
    sheet = np.zeros(N)
    sheet[on_ramp] = tin(push[on_ramp], RAMP_COLOUR, modes, ring_db=-7, wander_db=3.5, wander_hz=24,
                         drift_widths=[.25] * len(RAMP_MODES) + [1.8] * minor_count)
    low = butter(sheet, 1700)
    return tilt(undb(4) * (sheet - low + undb(body_db) * low), treble_db, split_hz=4800)


def thuds(shudder_s=.015):
    """A bump and brief shudder ring the hollow stop and floor; low modes swell last."""
    push, t = np.zeros(N + SR), T[:SR // 2]
    for (start_s, push_db), noise in zip(THUDS, rng.standard_normal((len(THUDS), len(t)))):
        start = int(start_s * SR)
        bump = 30 * (t == 0) + .6 * noise * np.exp(-t / shudder_s)
        push[start:start + len(t)] += undb(push_db) * bump
    ring = np.zeros(len(t))
    for k, (hz, db, t60_s) in enumerate(THUD_MODES):
        swell = 1 - np.exp(-t * hz / 1.1)
        ring += undb(db) * swell * decay(t, t60_s) * np.sin(2 * np.pi * hz * t + k * k)
    return undb(-25.5) * signal.oaconvolve(push[:N], ring)[:N]


def kitchen_reverb(x, level_db=-7, near_t60_s=.084, far_t60_s=.23, far_db=-6):
    """Short diffuse stereo tail off floor and cupboards; far walls answer fainter and longer."""
    t = T[:SR // 2]
    mid_noise, side_noise = rng.standard_normal((2, len(t)))
    mid = .73 * butter(mid_noise, 700, "high", order=1)
    side = (butter(side_noise, [2300, 4630], "band")
            + 1.2 * steep_band(side_noise, 450, 800)
            + .24 * band(side_noise, 11900, 5800)
            + .5 * band(mid_noise[::-1], 17000, 5460)  # reversed to decorrelate
            + .15 * band(side_noise[::-1], 14250, 6300)
            + .2 * band(side_noise[::-1], 1300, 700))
    onset = np.clip(t / .002 - 1, 0, 1)
    envelope = onset * (decay(t, near_t60_s) + undb(far_db) * decay(t, far_t60_s))
    tail = (mid + side * np.array([[1], [-1]])) * envelope
    tail /= np.sqrt(np.sum(tail ** 2, axis=1, keepdims=True))
    return undb(level_db) * signal.oaconvolve(x[None], tail, axes=1)[:, :N]


def scene():
    """Car and kitchen tail over hum and air."""
    car = ramp_rasp() + rolling() + clanks() + thuds()
    return car + kitchen_reverb(car) + hum() + air()


def record(dry):
    """Two microphone ports, each with its own lag and gain per frequency; bass and top cut."""
    low_cut_hz, high_cut_hz = 38, 15800
    size = next_fast_len(N + 4096)
    hz = np.arange(size // 2 + 1) * SR / size
    left = np.exp(.5j * curve(hz, PORT_LEAD)) * undb(curve(hz, PORT_BALANCE) / 2)
    ports = irfft(rfft(dry, size) * np.array([left, 1 / left]), size)[:, :N]
    ports = butter(ports, low_cut_hz, "high")
    return signal.sosfilt(signal.ellip(10, .2, 80, high_cut_hz, fs=SR, output="sos"), ports)


dry = scene()
out = record(dry)
store_pcm(out)
```